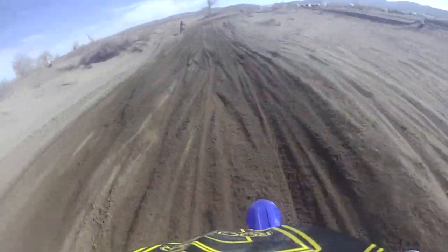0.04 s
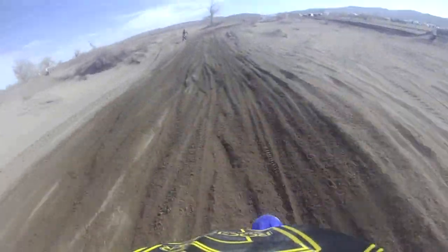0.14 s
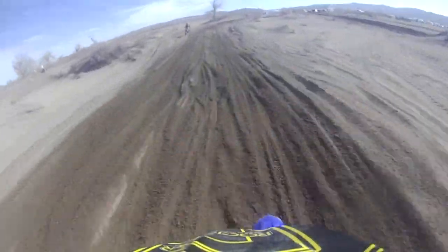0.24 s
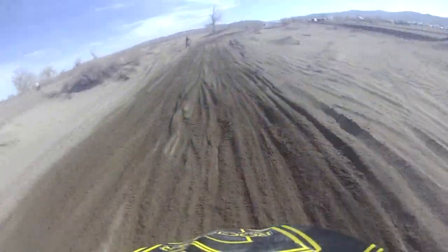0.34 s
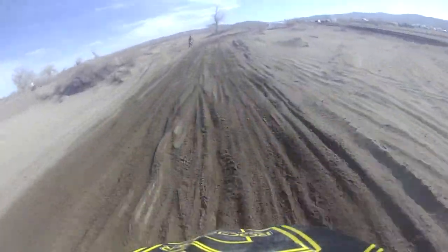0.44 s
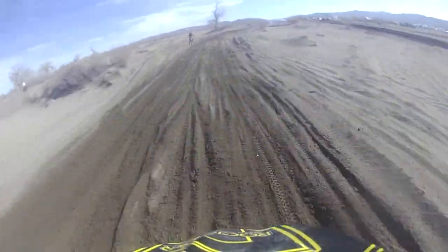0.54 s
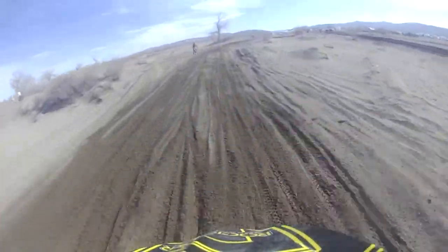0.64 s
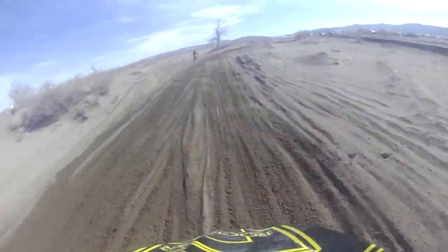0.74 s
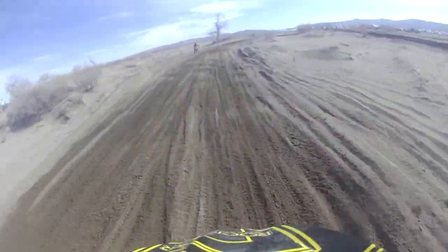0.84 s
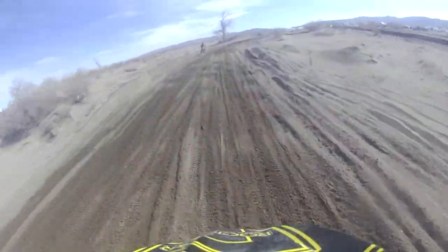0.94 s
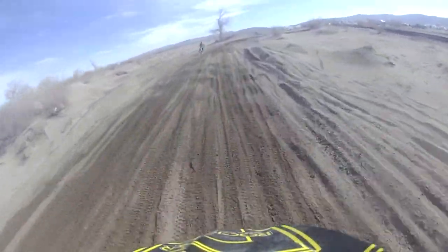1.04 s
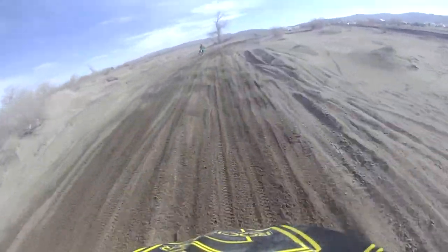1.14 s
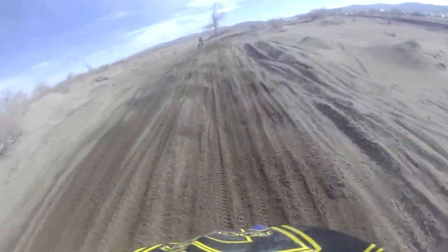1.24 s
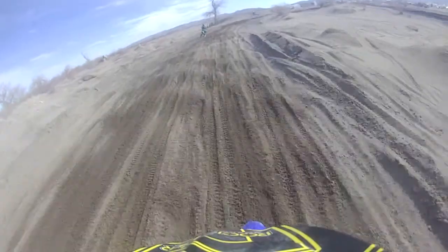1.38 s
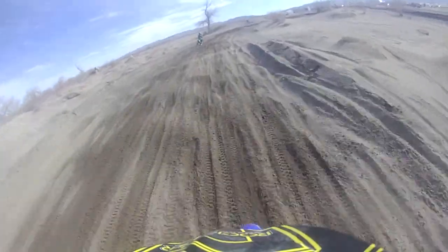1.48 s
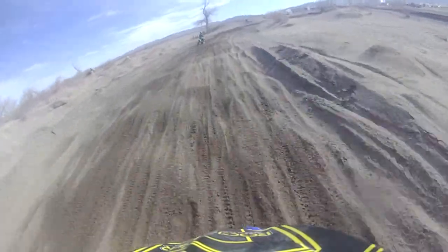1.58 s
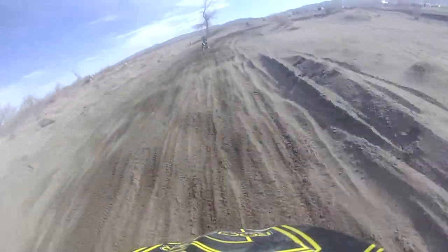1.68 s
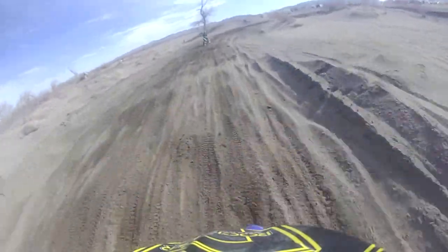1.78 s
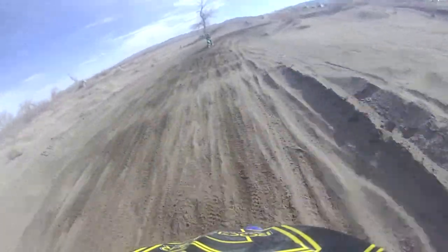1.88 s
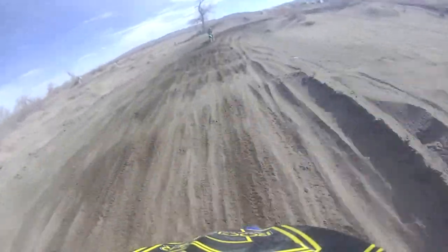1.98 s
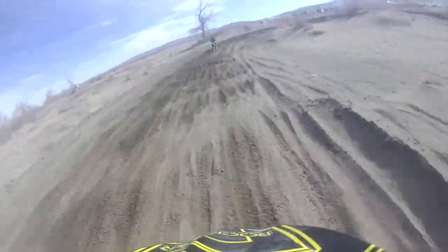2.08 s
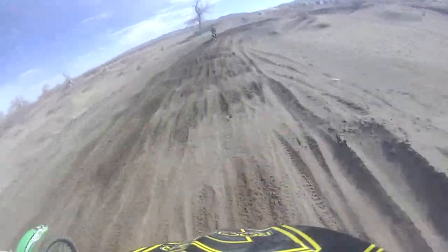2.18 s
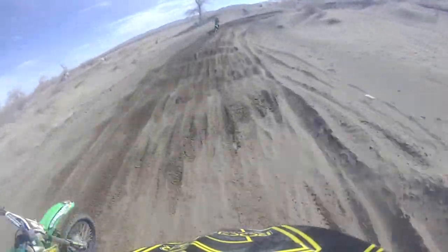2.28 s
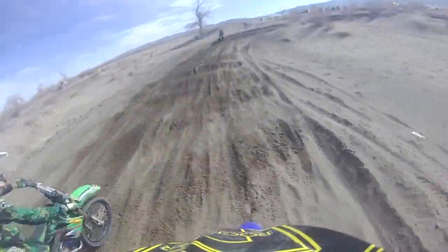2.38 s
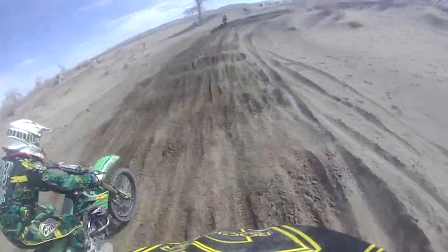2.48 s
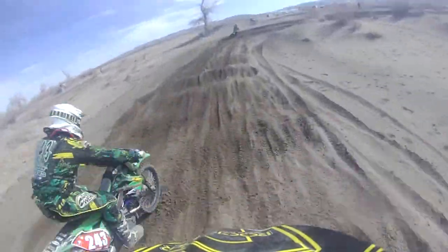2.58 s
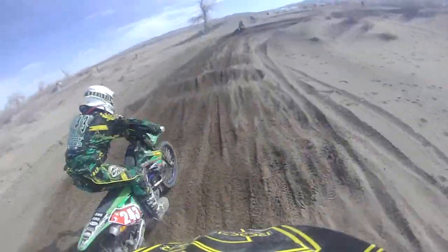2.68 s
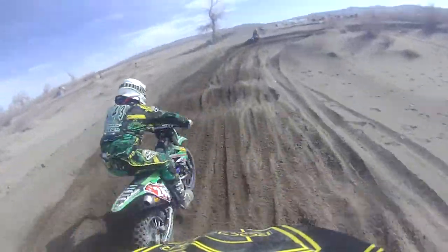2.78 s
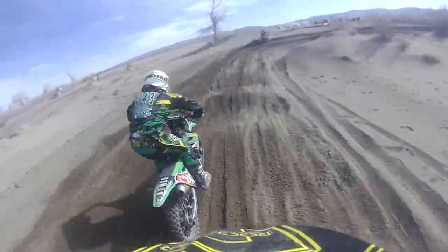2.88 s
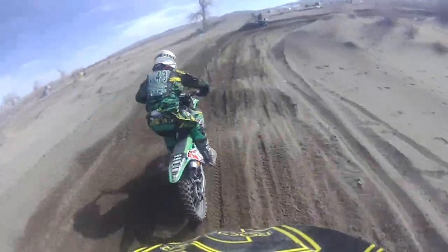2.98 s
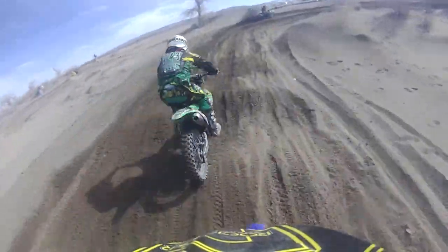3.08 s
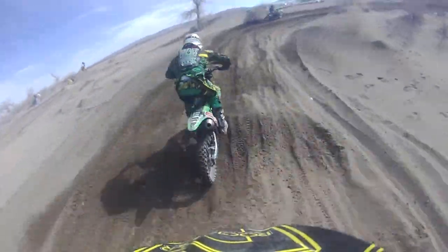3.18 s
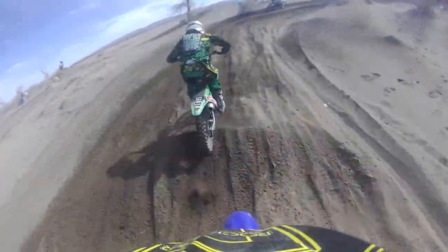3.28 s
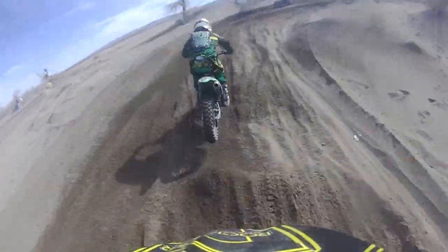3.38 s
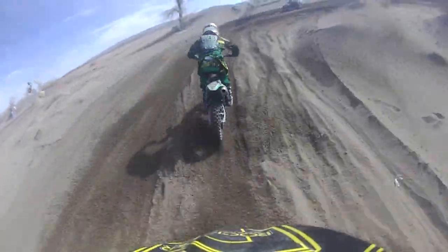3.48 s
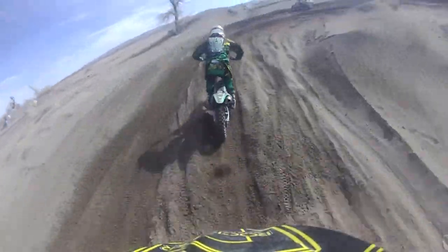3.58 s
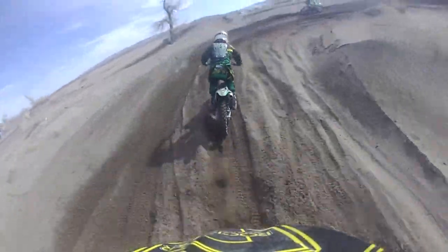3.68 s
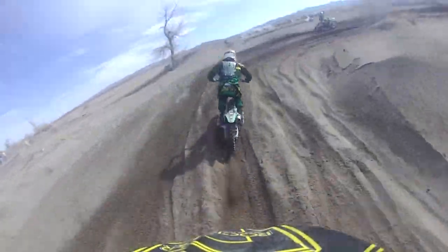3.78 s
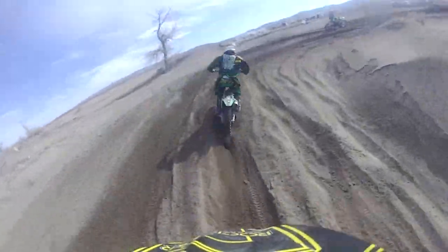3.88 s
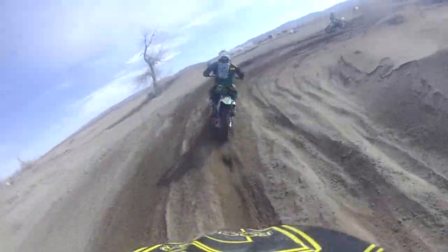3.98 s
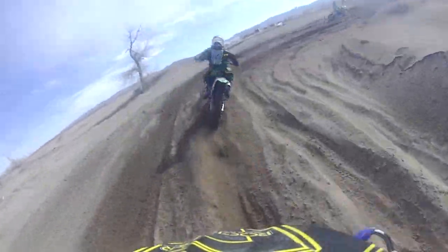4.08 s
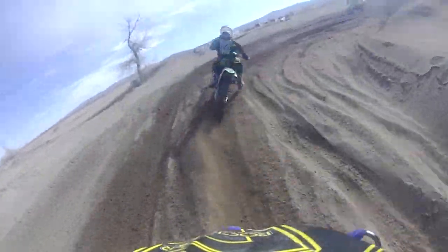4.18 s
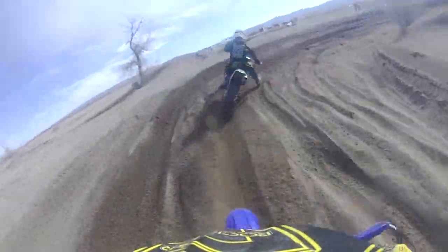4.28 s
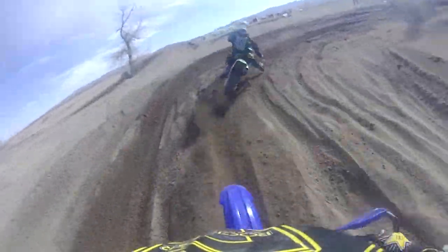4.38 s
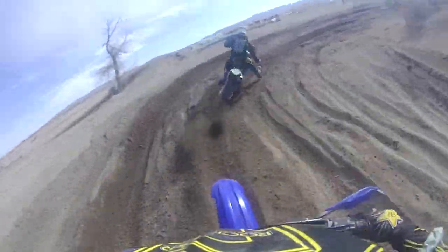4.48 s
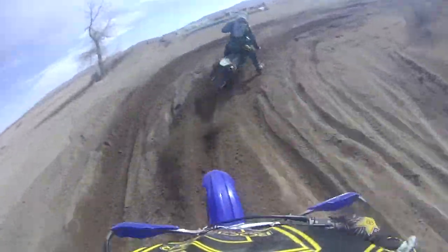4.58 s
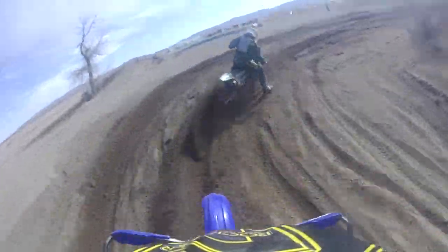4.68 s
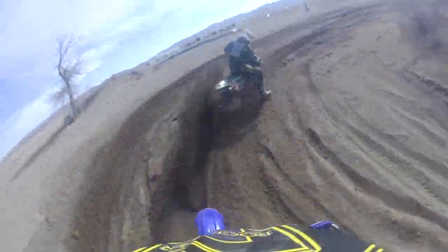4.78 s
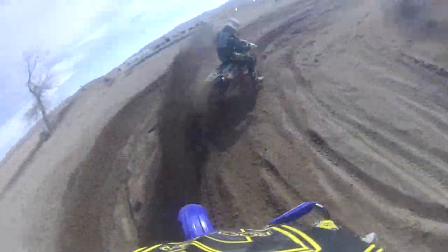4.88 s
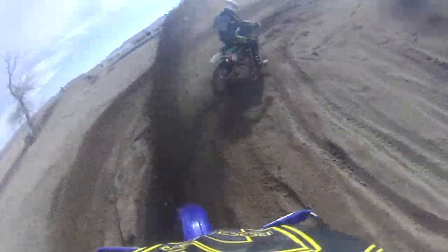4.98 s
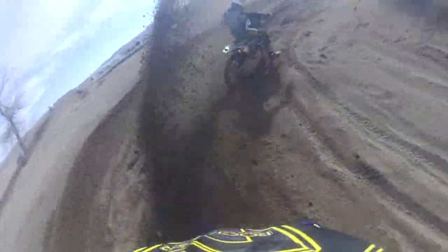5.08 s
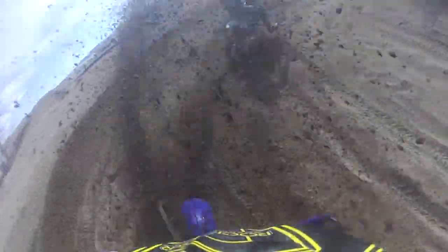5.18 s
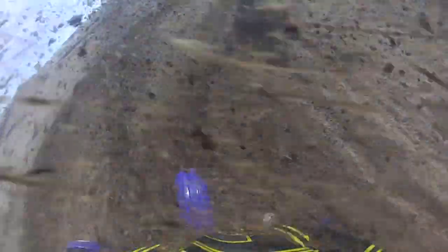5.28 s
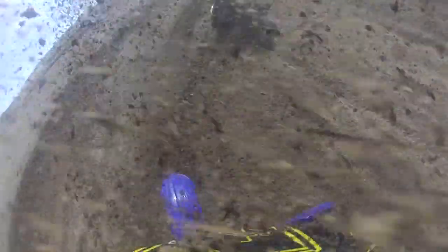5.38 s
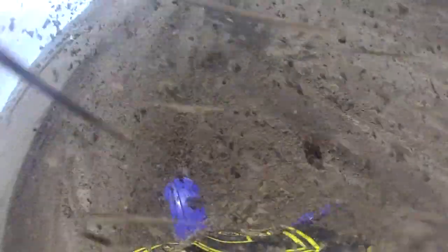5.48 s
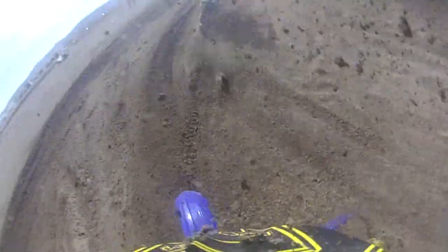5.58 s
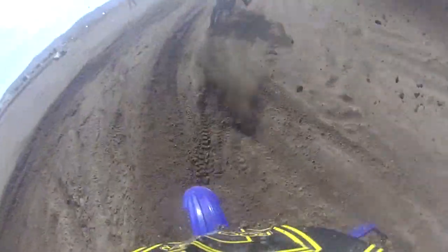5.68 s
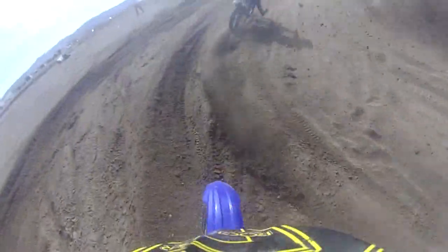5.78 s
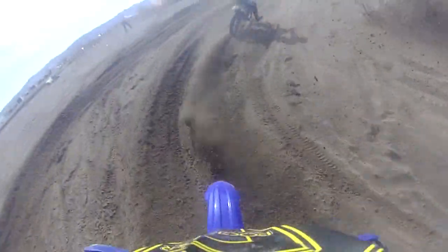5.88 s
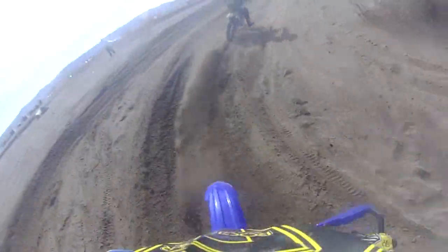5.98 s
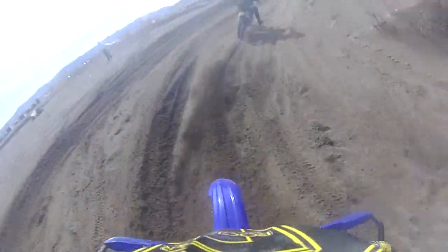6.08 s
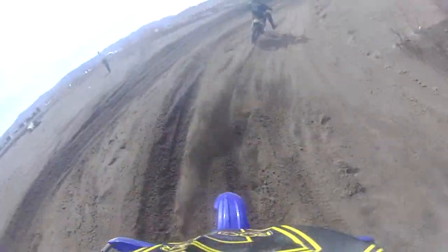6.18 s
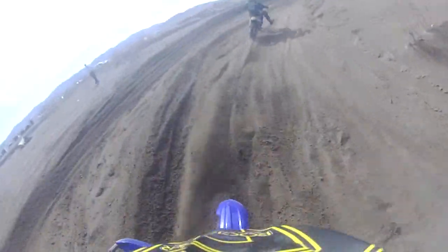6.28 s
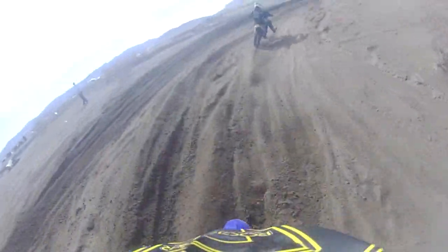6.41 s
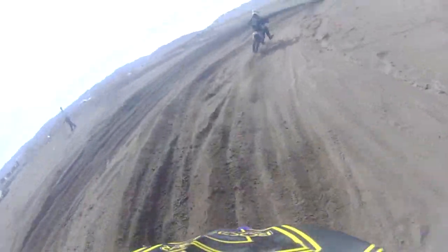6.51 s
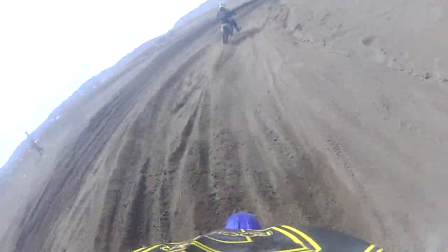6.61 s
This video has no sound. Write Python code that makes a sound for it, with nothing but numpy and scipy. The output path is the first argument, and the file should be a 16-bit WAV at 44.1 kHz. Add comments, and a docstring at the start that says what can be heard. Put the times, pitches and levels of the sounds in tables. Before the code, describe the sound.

From the rider's helmet, a four-stroke dirt bike rasps fast through rushing wind, with another bike droning behind and small jolts knocking the mount. It backs off to a dull putter, then pops slowly as the other bike passes and buzzes faintly ahead. Two hard blips follow in the turn; sand sprays over the case with one very loud smack, and the engine settles into steady, throaty popping.

```python
"""A four-stroke dirt bike on a sand track: its single cylinder rasps at speed, coasts, then is blipped in a turn.
Each firing is a pulse that excites exhaust, airbox and intake resonances and releases turbulent gas noise.
A second bike, harmonics and pulse-excited noise, drones behind the rider and later buzzes ahead.
Filtered noise makes the wind at the helmet; decaying sines are bumps that knock the camera.
Random impulses, shaped by the struck case, are the sand thrown by the bike ahead."""
import sys
import numpy as np
from scipy import signal
from scipy.fft import rfft, irfft
from scipy.io import wavfile

SR = 44100
rng = np.random.default_rng(int(sys.argv[2]) if len(sys.argv) > 2 else 0)


def inscribe(sig):
    """Save sig as 16-bit PCM at rate SR to the path in sys.argv[1].

    A 1-D sig is mono; a 2-D sig holds one channel per row.
    Samples are clipped to [-1, 1] before scaling.
    """
    pcm = np.round(np.clip(np.atleast_2d(sig).T, -1, 1) * 32767)
    wavfile.write(sys.argv[1], SR, pcm.astype(np.int16))


N = 293265
TIME = np.arange(N) / SR


def amp(db):
    """Logarithmic level: decibels to amplitude gain."""
    return 10 ** (np.asarray(db) / 20)


def unit(x):
    """Power normalisation: scales to rms 1."""
    return x / np.sqrt(np.mean(x ** 2) + 1e-20)


def curves(rows):
    """Linear interpolation of each column of a timed table, sample by sample."""
    s, *columns = np.transpose(rows)
    return [np.interp(TIME, s, column) for column in columns]


def held(events, rest, fall_s):
    """Trapezoidal envelope: each (start, end, rise, value) rises from the level so far, holds, falls after its end."""
    level = np.full(N, float(rest))
    for start, end, rise_s, value in events:
        rise = (TIME - start) / rise_s
        fall = 1 - (TIME - end) / fall_s
        gate = np.clip(np.minimum(rise, fall), 0, 1)
        level = level + gate * (value - level)
    return level


def drift(hz):
    """Low-passed random motion: noise that falls away steeply above hz, rms 1."""
    rolloff = 1 + (np.fft.rfftfreq(N, 1 / SR) / hz) ** 4
    return unit(irfft(rfft(rng.standard_normal(N)) / rolloff, N))


def response(points, size=4096):
    """Minimum phase: the causal impulse response, of energy 1, that a given magnitude spectrum implies."""
    hz, db = np.transpose(points)
    log_hz = np.log(abs(np.fft.fftfreq(size, 1 / SR)) + 1)
    log_gain = np.log(amp(np.interp(log_hz, np.log(hz), db)))
    spectrum = np.exp(np.conj(signal.hilbert(log_gain)))
    h = np.fft.ifft(spectrum).real[:size // 2]
    return h / np.linalg.norm(h)


def colour(x, points):
    """Source-filter principle: convolves a source with a body of the given spectrum."""
    return signal.oaconvolve(x, response(points))[:N]


def resonate(x, hz, width):
    """Cascaded resonance: two equal peak filters in series, keeping the power of white input."""
    b, a = signal.iirpeak(min(hz, SR * .45), hz / width, SR)
    once = signal.lfilter(b, a, signal.unit_impulse(4096))
    ring = signal.lfilter(b, a, once)
    return signal.oaconvolve(x, ring / np.linalg.norm(ring))[:N]


def sweep(x, hz, width):
    """Heterodyned resonance: a double pole in a frame rotating at the curve hz, keeping the power of white input."""
    turn = np.exp(2j * np.pi * np.cumsum(hz) / SR)
    r = np.exp(-np.pi * width / SR)
    ring = turn * signal.lfilter([1], [1, -2 * r, r * r], x * turn.conj() + 1e-18)
    return ring.real * (1 - r * r) * np.sqrt(2 * (1 - r * r) / (1 + r * r))


def reflect(x, delay_s, share):
    """Comb interference: adds one delayed copy, a bounce off a surface."""
    return (x + share * np.interp(TIME - delay_s, TIME, x)) / np.hypot(1, share)


def pulses(turns):
    """Periodic impulse source: one click for each whole turn, rms about 1."""
    clicks = np.diff(np.floor(turns), prepend=np.floor(turns[0]))
    return clicks / np.sqrt(abs(np.gradient(turns)) + 1e-9)


def add(mix, s, sound):
    """Superposition: mixes a sound in at time s."""
    part = mix[round(s * SR):][:len(sound)]
    part += sound[:len(part)]


# gusts and one lull in the airflow; columns: start_s [s], end_s [s], rush_db [dB], deep_buffeting_db [dB]
GUST_EVENTS = [(0.325, 0.445, 2.5, -2), (1.052, 1.086, 6, 5), (2.206, 2.405, 3.5, 3), (3.344, 3.625, 1, 8),
               (3.633, 4, -6.5, -5), (4.003, 4.178, 2.5, 0)]


def gusts(column, edge_s=0.036):
    """Amplitude modulation by gusts: the lift or dip in dB of the rush (0) or the deep buffeting (1)."""
    return held([(start, end, edge_s, lifts[column]) for start, end, *lifts in GUST_EVENTS], 0, edge_s)


# airflow over the helmet, before gusts; columns: time_s [s], level_db [dB]
WIND_LEVEL = [(0, -40.5), (.7, -39.5), (1.3, -42), (2.0, -45.5), (3.0, -48), (4.1, -46.5), (4.55, -47),
              (5.2, -46), (5.6, -43.5), (5.9, -45), (6.25, -48), (6.65, -42.5)]
# spectrum of the airflow; columns: frequency_hz [Hz], relative_db [dB per Hz]
WIND_SPECTRUM = [(20, -26.5), (60, -21), (111, -5), (170, -4.5), (250, -1), (360, -6), (450, -6.5),
                 (620, -13), (1020, -20), (2200, -30), (4000, -45), (7700, -51.5), (12000, -60),
                 (15000, -90)]


def wind(lump_hz=44, split_hz=800, low_lump_db=1.9, air_lump_db=1.97):
    """Turbulent boundary-layer noise: eddies modulate the bands below and above the split in quick lumps."""
    level_db = curves(WIND_LEVEL)[0] + gusts(0)
    noise = colour(rng.standard_normal(N), WIND_SPECTRUM)
    low = signal.sosfiltfilt(signal.butter(2, split_hz, fs=SR, output="sos"), noise)
    eddies = np.clip(drift(lump_hz), -2, 2)
    lumpy = low * amp(low_lump_db * eddies) + (noise - low) * amp(air_lump_db * eddies)
    return amp(level_db) * unit(lumpy)


# spectrum of the pressure swings; columns: frequency_hz [Hz], relative_db [dB per Hz]
BUFFET_SPECTRUM = [(15, -6), (35, -8.5), (70, 5.5), (130, -4.5), (300, -19), (1000, -56.5)]


def buffet(level_db=-59):
    """Pseudo-sound: slow pressure swings over the microphone port; level_db is the level between gusts."""
    return amp(level_db + gusts(1)) * colour(rng.standard_normal(N), BUFFET_SPECTRUM)


def air(peak_s=2.46, peak_db=-74.5, width_s=0.43, fall_db=7):
    """Band-limited noise under a Gaussian swell: fine hiss as the other bike draws alongside."""
    level_db = peak_db - fall_db * ((TIME - peak_s) / width_s) ** 2  # fall_db lower, one width from the peak
    return amp(level_db) * resonate(rng.standard_normal(N), 4800, 5200)


def scatter(x, decay_s=0.01, passing_hz=7, count=3):
    """Diffuse scattering: rough ground rushing past smears a distant sound by ever-changing paths."""
    t = TIME[:2048]
    paths = rng.standard_normal((count, len(t))) * np.exp(-t / decay_s)
    shares = np.array([drift(passing_hz) for _ in paths])
    shares = shares / np.linalg.norm(shares, axis=0)
    return unit(sum(share * signal.oaconvolve(x, path)[:N] for share, path in zip(shares, paths)))


# the other bike's engine speed, behind; columns: time_s [s], crank_hz [Hz]
RIVAL_BEHIND = [(0, 131), (.07, 122), (.12, 130), (.21, 135.5), (.33, 135.5), (.38, 141), (.435, 153),
                (.48, 141), (.53, 143.5), (.6, 136.5), (.68, 140), (.78, 129), (.9, 105)]
# the other bike, ahead; columns: time_s [s], crank_hz [Hz], buzz_db [dB]
RIVAL_AHEAD = [(3.35, 119.2, -102), (3.56, 119.3, -64), (3.63, 127.4, -60), (3.72, 127.5, -59),
               (3.8, 125.8, -60), (3.85, 123, -62.5), (3.96, 117.7, -59.5), (4.06, 126, -60),
               (4.125, 130.4, -59), (4.164, 128.9, -54.5), (4.23, 137.2, -55.5), (4.33, 140.6, -53),
               (4.384, 134.6, -54.5), (4.52, 136.9, -56.5), (4.62, 134, -54), (4.9, 121.4, -62)]
# level of its drone before flutter; columns: time_s [s], level_db [dB]
RIVAL_DRONE_LEVEL = [(0, -38), (.14, -34.5), (.37, -31.5), (.5, -34.5), (.68, -40.5), (.78, -40),
                     (.92, -53), (1.1, -100)]
# balance of its drone; columns: harmonic [multiple of half the crank rate], relative_db [dB]
DRONE_HARMONICS = [(2, -15), (4, 6), (7, -13), (8, -7), (9, -10.5), (10, -17), (12, -22)]
# spectrum of its buzz; columns: frequency_hz [Hz], relative_db [dB per Hz]
BUZZ_SPECTRUM = [(120, 1), (250, -2), (520, 0), (770, 1), (1030, 3), (1300, -1), (1550, 0), (1800, -1),
                 (2100, -7), (2600, -9), (3500, -18), (5400, -19), (5800, -12), (6300, -20), (8000, -17),
                 (11000, -28), (15000, -40)]


def rival(flutter_db=2.0, drone_flutter_db=0.5):
    """Harmonic synthesis and directivity: a drone from behind, a buzz once its pipe points back at the rider."""
    hz, = curves(RIVAL_BEHIND + [row[:2] for row in RIVAL_AHEAD])
    drone_db, = curves(RIVAL_DRONE_LEVEL)
    buzz_db = np.maximum(curves(RIVAL_AHEAD)[1], drone_db - 27)  # a faint buzz goes with the drone
    turns = np.cumsum(hz * (1 + .002 * drift(25))) / SR
    drone = sum(amp(db) * np.sin(np.pi * round(k) * turns) for k, db in DRONE_HARMONICS)
    gas = unit((0.64 + np.exp(-(turns % 1) / 0.9)) * rng.standard_normal(N))
    strokes = pulses(2 * turns) * (1 + .4 * np.cos(2 * np.pi * turns))  # a strong and a weak pulse in each turn
    tonal_hz = 2900  # turbulence takes over above this
    tonal = signal.sosfilt(signal.butter(2, tonal_hz, fs=SR, output="sos"), strokes)
    hiss = signal.sosfilt(signal.butter(2, tonal_hz, "high", fs=SR, output="sos"), gas)
    direct = unit(colour(tonal + .33 * gas + .7 * hiss, BUZZ_SPECTRUM))
    buzz = unit(direct + .6 * scatter(direct))
    flutter = drift(4.4)
    return unit(drone) * amp(drone_db + drone_flutter_db * flutter) + buzz * amp(buzz_db + flutter_db * flutter)


# jolts to the camera; columns: start_s [s], peak_db [dB], pitch_hz [Hz], ring_s [s to fall 60 dB]
BUMP_EVENTS = [(.334, -24, 517, 0.0061), (.341, -20, 240, .014), (.349, -17.5, 290, 0.01),
               (.413, -24.5, 165, 0.072), (.423, -19, 524, 0.0052), (.571, -28, 420, 0.0066),
               (.593, -20, 367, 0.012), (1.104, -28, 216, 0.022), (1.309, -26.5, 334, 0.0091),
               (1.457, -27, 213, 0.025), (1.80, -27.5, 332, 0.014), (2.227, -30, 272, 0.059),
               (2.516, -34, 240, 0.022), (2.572, -28, 163, 0.049), (3.411, -30, 141.5, 0.033),
               (3.609, -26.5, 169, 0.034), (3.857, -27.5, 302, 0.014), (3.901, -32.5, 259.4, 0.022),
               (3.928, -28.5, 173, 0.028), (4.035, -34, 300, 0.017), (5.567, -17.5, 401, 0.034)]


def bumps(rise_s=0.00063, overtone=2.17, overtone_db=-13):
    """Damped modal vibration: jolts ring the camera mount at one pitch and a faster-dying inharmonic overtone."""
    out, t = np.zeros(N), np.arange(SR // 8) / SR
    for s, db, hz, ring_s in BUMP_EVENTS:
        decay = amp(-60 * t / ring_s)
        fundamental = decay * np.sin(2 * np.pi * hz * t)
        upper = amp(overtone_db) * decay ** 2 * np.sin(2 * np.pi * hz * overtone * t)
        knock = (fundamental + upper) * (1 - np.exp(-t / rise_s))
        add(out, s, amp(db) * knock / abs(knock).max())
    return out


# a thin shower of sand with two thick bursts inside it; columns: start_s [s], end_s [s], level_db [dB]
SAND_SHOWERS = [(4.718, 6.1, -80), (5.279, 5.425, -37), (5.48, 5.563, -49.5)]
# large grains on the case; columns: start_s [s], peak_db [dB]
LARGE_GRAINS = [(2.047, -46.5), (2.817, -44), (3.241, -33), (3.62, -35.5), (5.225, -29), (5.295, -24.5),
                (5.331, -10.5), (5.377, -18), (5.403, -25), (5.499, -22), (5.552, -17), (5.63, -28),
                (5.866, -39)]
# spectrum of a grain's tick; columns: frequency_hz [Hz], relative_db [dB per Hz]
GRAIN_SPECTRUM = [(100, -11), (500, 6), (1500, 2.5), (3000, -3.5), (4200, -2.5), (6000, 4), (9000, 1.5),
                  (14000, -7.5), (16000, -12)]
# spectrum of the clod's smack; columns: frequency_hz [Hz], relative_db [dB per Hz]
CLOD_SPECTRUM = [(40, -32), (150, -8), (350, 1), (700, -2.5), (1300, -8), (1900, -26), (2400, -10.5),
                 (3600, -11), (6000, -18), (9000, -31), (15000, -34)]
CLOD_S, CLOD_PEAK_DB = 5.4373, 0.5


def sand(grains_per_s=2600, spread_db=4.5):
    """Random impact process: fine grains, a few large ones and one clod excite the case as impulses."""
    spray_db = held([(start, end, 0.081, db) for start, end, db in SAND_SHOWERS], -110, 0.17)
    sizes = amp(spread_db * np.minimum(rng.exponential(1, N), 3.5)) * rng.choice([-1, 1], N)
    hits = sizes * (rng.random(N) < grains_per_s / SR)
    out = colour(unit(hits) * amp(spray_db), GRAIN_SPECTRUM)
    tick, smack = response(GRAIN_SPECTRUM), response(CLOD_SPECTRUM)
    for s, db in LARGE_GRAINS:
        add(out, s, amp(db) * tick / abs(tick).max())
    add(out, CLOD_S, amp(CLOD_PEAK_DB) * smack / abs(smack).max())
    return out


# stretches of engine sound under load, each taking over from the one before, levels at the reference speed;
# columns: start_s [s], end_s [s], rise_s [s], exhaust_beat_db, airbox_boom_db, silencer_ring_db,
# intake_bark_db, crack_db, gas_rasp_db, treble_lift_db [all dB]
LOAD_STRETCHES = [(-.1, 0.29, .05, -47.5, -57, -62, -55, -72, -54, 10),
                  (0.425, 1.05, 0.076, -50, -50.5, -57, -73, -62, -52, -3),
                  (.95, 1.405, .12, -50, -56, -61, -65, -58.5, -50.5, 13),
                  (2.45, 2.98, 0.073, -59, -46.5, -58, -70, -64, -69.5, 9),
                  (2.917, 3.227, 0.11, -51.5, -44.5, -46.5, -58, -51.5, -60.5, -0.5),
                  (3.3, 3.443, 0.037, -56, -47, -48, -64, -57.5, -66, -1),
                  (3.952, 5.561, 0.39, -45, -45, -77, -66, -54, -64.5, 3),
                  (4.484, 4.61, 0.094, -48, -36.5, -59, -55, -41.5, -52.5, -20),
                  (4.719, 4.853, 0.071, -32, -42, -61, -47, -42.5, -59, -19),
                  (4.751, 5.101, 0.094, -35.5, -46.5, -63, -62, -40.5, -50.5, 7),
                  (5.094, 5.237, .07, -45.5, -47, -62, -50, -55, -58.5, 7),
                  (5.242, 5.386, 0.033, -41, -38.5, -74, -59, -40, -46, -5),
                  (5.52, 5.796, 0.06, -40.5, -48, -44.5, -52, -48, -62.5, -4),
                  (5.78, 5.96, 0.056, -37.5, -43, -47, -54.5, -47, -58.5, -2),
                  (5.931, 6.208, 0.071, -41.5, -47.5, -42.5, -54, -48, -59.5, -4),
                  (6.19, 6.292, .04, -45, -49, -42.5, -57.5, -59, -62.5, -9),
                  (6.281, 6.529, 0.059, -42.5, -48, -48.5, -55, -56.5, -63.5, -13),
                  (6.509, 6.701, 0.067, -46.5, -43.5, -43, -50, -62, -61, -9)]
# the same seven levels, beat to treble lift, outside those stretches, at the reference speed [dB]
REST_LEVELS = [-61, -49, -53, -77, -65, -72, -21]
# change of each of the seven with engine speed [dB per octave]
SPEED_SLOPES = [5.5, 1, 3, 4, 2.5, 3, -2]
REFERENCE_RATE, RELEASE_S = 60, 0.053  # firings per second; s


def engine_levels(rate):
    """Load and speed dependence: seven levels follow the stretches under load and a slope per octave of speed."""
    octaves = np.log2(rate / REFERENCE_RATE)
    levels_db = []
    for k, (rest, slope) in enumerate(zip(REST_LEVELS, SPEED_SLOPES)):
        stretches = [(start, end, rise, levels[k]) for start, end, rise, *levels in LOAD_STRETCHES]
        levels_db.append(held(stretches, rest, RELEASE_S) + slope * octaves)
    return levels_db


# shifting resonances; columns: time_s [s], silencer_hz [Hz], mean_intake_hz [Hz]
RESONANCE_TUNING = [(0, 258, 1620), (2.6, 235, 1440), (3.0, 220, 1390), (3.45, 240, 1370), (4.3, 260, 1650),
                    (4.6, 222.1, 1499), (4.85, 262.2, 1650), (5.18, 268, 1213), (5.35, 280, 1600),
                    (5.62, 290.3, 1270), (5.76, 265, 1273), (5.9, 267, 1420), (6.2, 258, 1420),
                    (6.3, 258.5, 1493), (6.4, 250, 1680), (6.52, 261.6, 1620), (6.59, 278, 1020),
                    (6.65, 285, 973)]


def silencer(cycles, rate, burn, pipe_db, width_hz=94, lag_s=.0017):
    """Pulse-excited resonance: each firing rings the silencer after a short lag."""
    pipe_hz = curves(RESONANCE_TUNING)[0]
    return sweep(pulses(cycles - lag_s * rate) * burn * amp(pipe_db), pipe_hz, width_hz)


def intake(blast, bark_db, wander=.07, width_hz=490):
    """Pulse-excited resonance: an intake bark, inverted so it adds to the crack, wandering in pitch."""
    bark_hz = curves(RESONANCE_TUNING)[1] * (1 + wander * drift(19))
    return -sweep(blast * amp(bark_db), bark_hz, width_hz)


# howl of the header pipe under load, its pitch rising and falling;
# columns: time_s [s], pitch_hz [Hz], level_db [dB]
HEADER_HOWL = [(3.9, 390, -100), (4.1, 391, -58), (4.3, 392, -49), (4.48, 420.5, -47), (4.54, 531.6, -39),
               (4.61, 562, -42), (4.7, 489, -60), (4.83, 495.5, -46), (4.95, 480, -49), (5.06, 450, -45),
               (5.18, 410, -51), (5.3, 499, -45), (5.48, 450, -56), (5.72, 500, -52), (5.95, 510, -48),
               (6.2, 519, -51), (6.26, 480, -64), (6.65, 520, -61)]


def header(cycles, rate, burn, hard_db, width_hz=170, lag_s=0.00029):
    """Pipe resonance: firings excite a howl whose pitch follows its own curve."""
    howl_hz, howl_db = curves(HEADER_HOWL)
    return sweep(pulses(cycles - lag_s * rate) * burn * amp(howl_db + hard_db / 2), howl_hz, width_hz)


def song(cycles, peak_s=4.6, peak_db=-37, width_s=0.069, fall_db=8):
    """Harmonic emphasis: the third harmonic of the firing rate sings out at the top of the first blip."""
    third = np.sin(6 * np.pi * cycles)
    return third * amp(peak_db - fall_db * ((TIME - peak_s) / width_s) ** 2)


def shade(x, treble_db, corner_hz=2600):
    """Shelving filter: the pops grow brighter or duller along treble_db."""
    dull = signal.sosfiltfilt(signal.butter(2, corner_hz, fs=SR, output="sos"), x)
    return dull + amp(treble_db) * (x - dull)


# spectrum of the exhaust beat; columns: frequency_hz [Hz], relative_db [dB per Hz]
BEAT_SPECTRUM = [(30, -25.5), (55, -21), (105, -1), (200, -1.5), (300, -2.5), (530, 1.5), (650, 0),
                 (850, -8.5), (1200, -9.5), (1700, -17), (2500, -31), (4500, -74), (10000, -73),
                 (15000, -69)]
# spectrum of the crack; columns: frequency_hz [Hz], relative_db [dB per Hz]
CRACK_SPECTRUM = [(100, -32.5), (500, 0.5), (900, 6), (1300, 11), (1650, 9.5), (2300, -4), (3300, -24),
                  (4200, -27), (5100, -23), (9000, -28.5), (13000, -34), (15500, -51)]


def exhaust(pushes, blast, beat_db, crack_db, treble_db):
    """Impulse radiation and interference: each pop is a beat and a crack, combed by reflections."""
    beat = colour(pushes * amp(beat_db), BEAT_SPECTRUM)
    crack = colour(blast * amp(crack_db), CRACK_SPECTRUM)
    # a bounce off the rider's shoulder, shifting as the head moves
    bounce_s = .000966 * (1 + .13 * drift(4))
    crack = reflect(crack, delay_s=bounce_s, share=.35)
    # each pop runs down the pipe and back once more
    return reflect(shade(beat + crack, treble_db), delay_s=0.00525, share=.15)


def puffs(cycles, rate, lag_s, puff_s=.001, leak=.022):
    """Modulated turbulence: gas noise that swells and dies away after each firing, over a small leak, rms 1."""
    age = ((cycles - lag_s * rate) % 1) / rate / puff_s
    return unit((leak + np.sqrt(age) * np.exp(-age / 1.44)) * rng.standard_normal(N))


# spectrum of each puff's sharp front; columns: frequency_hz [Hz], relative_db [dB per Hz]
SNAP_SPECTRUM = [(300, -39), (900, -5), (1600, 7.5), (2800, -0.5), (3800, -9), (5000, -20), (9000, -35),
                 (15000, -45)]
# spectrum of the gas rasp; columns: frequency_hz [Hz], relative_db [dB per Hz]
RASP_SPECTRUM = [(200, -12.5), (700, 3.5), (1200, 3), (2100, -1), (3200, -17.5), (4500, -28.5), (6400, -29),
                 (10600, -43), (15000, -52)]
# cavities the escaping gas sizzles in; columns: frequency_hz [Hz], width_hz [Hz], relative_db [dB]
SIZZLE_MODES = [(2680, 650, -13), (3245, 780, -16.5), (3740, 440, -21), (5030, 220, -26), (5920, 310, -25),
                (7160, 1000, -20.5), (8870, 1100, -23), (12100, 780, -33)]


def escaping_gas(cycles, rate, firing, gas_db):
    """Jet noise: a sharp snap, a broadband rasp, and a later sizzle in small cavities."""
    snap = colour(firing * amp(gas_db - 1.5), SNAP_SPECTRUM)
    rasp = colour(puffs(cycles, rate, lag_s=-.0003) * amp(gas_db - 2), RASP_SPECTRUM)
    gas = puffs(cycles, rate, lag_s=0.0008) * amp(gas_db)
    sizzle = sum(amp(db) * resonate(gas, hz, width) for hz, width, db in SIZZLE_MODES)
    return snap + rasp + sizzle


# engine speed at its turning points; columns: time_s [s], firing_rate [firings per second]
FIRING_RATE = [(0.0, 63.06), (0.286, 72.64), (0.468, 56.28), (0.644, 75.87), (0.8, 84.64), (1.041, 71.74),
               (1.328, 75.67), (1.627, 50.45), (2.649, 35.27), (2.888, 29.08), (3.071, 36.0),
               (3.273, 37.04), (3.439, 32.1), (4.031, 37.98), (4.479, 63.86), (4.605, 77.69), (4.82, 56.15),
               (5.017, 45.26), (5.287, 69.03), (5.378, 89.41), (5.484, 64.53), (5.586, 51.52),
               (5.752, 52.58), (5.985, 51.23), (6.091, 47.15), (6.19, 47.2), (6.25, 50.1), (6.39, 48.3),
               (6.44, 53), (6.65, 54)]
# firings that burn harder or weaker than the rest; columns: time_s [s], extra_db [dB]
UNEVEN_FIRINGS = [(2.514, 6), (2.681, 4), (3.056, 1), (3.167, 3), (3.331, 5), (3.389, 2.5), (3.419, 6.5),
                  (3.45, 5), (4.829, 5), (4.847, 3), (4.884, 0.5), (4.965, 1.5), (5.006, -3.5), (5.049, 5),
                  (5.128, 6.5), (5.64, 6), (5.717, 6), (5.755, 2.5), (5.832, 2.5), (5.909, 3), (6.067, 0.5),
                  (6.152, 2), (6.193, 4), (6.215, 4.5), (6.357, -6), (6.378, 4.5), (6.494, 3.5)]
# spectrum of the airbox boom; columns: frequency_hz [Hz], relative_db [dB per Hz]
BOOM_SPECTRUM = [(30, -23), (75, -9.5), (150, 3), (230, -3.5), (330, -10), (600, -53), (2000, -111)]


def engine():
    """Source-filter synthesis: uneven firing pulses and gas puffs drive every resonance of the engine."""
    rate, = curves(FIRING_RATE)
    beat_db, boom_db, pipe_db, bark_db, crack_db, rasp_db, treble_db = engine_levels(rate)
    cycles = np.cumsum(rate) / SR - .05 + .003 * drift(25)  # one per firing, with slight jitter
    age_s = (cycles % 1) / rate
    burn = amp(.9 * (50 / rate) ** 2 * np.clip(drift(37), -2, 2))  # combustion is erratic at low speed
    hard_db = held([(s - .004, s + .006, .002, db) for s, db in UNEVEN_FIRINGS], 0, .002)
    firing = pulses(cycles) * burn
    puff = unit(np.exp(-age_s / .0015) * rng.standard_normal(N)) * burn
    pushes = (firing + .05 * puff) * amp(hard_db / 2)
    blast = (firing + .3 * puff) * amp(hard_db)
    boom = colour(firing * amp(boom_db), BOOM_SPECTRUM)
    ring = silencer(cycles, rate, burn, pipe_db)
    howl = header(cycles, rate, burn, hard_db)
    bark = intake(blast, bark_db)
    pop = exhaust(pushes, blast, beat_db, crack_db, treble_db)
    gas = escaping_gas(cycles, rate, firing, rasp_db + hard_db)
    return boom + ring + howl + song(cycles) + bark + pop + gas


def scene():
    """Superposition: every source adds at one helmet microphone."""
    return (wind() + buffet() + air() + rival() + bumps() + sand() + engine())[None]


def record(dry, edge_hz=15800, fade_s=.004):
    """Band limitation: a linear-phase low-pass for the camera's upper limit, with soft ends."""
    ends = np.minimum(np.minimum(TIME, TIME[-1] - TIME) / fade_s, 1)
    low_pass = signal.firwin(255, edge_hz, window=("kaiser", 9), fs=SR)
    return signal.oaconvolve(dry * ends, low_pass[None], "same")


dry = scene()
out = record(dry)
inscribe(out)
```